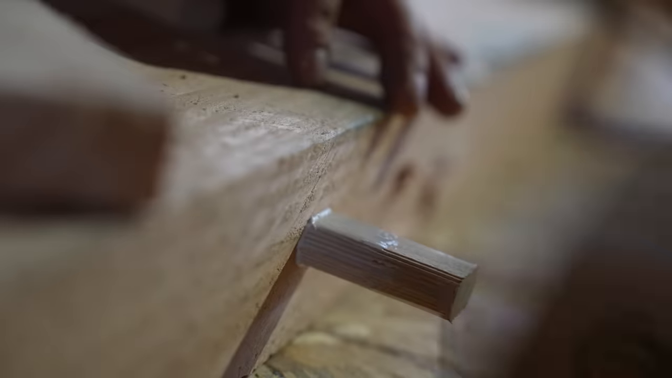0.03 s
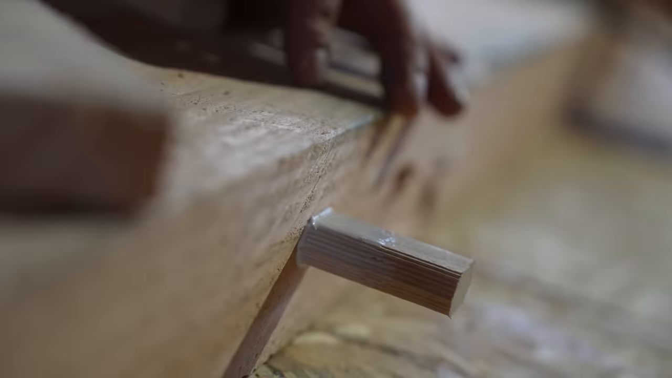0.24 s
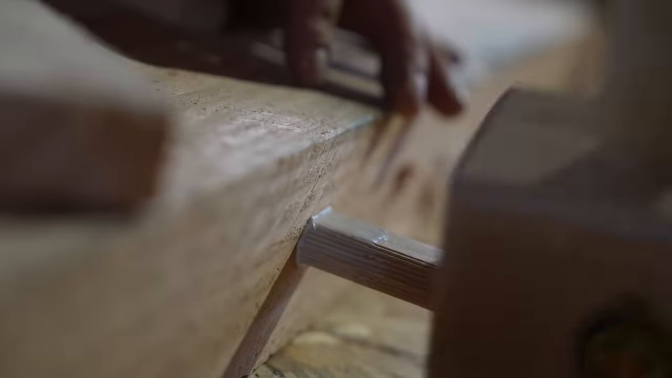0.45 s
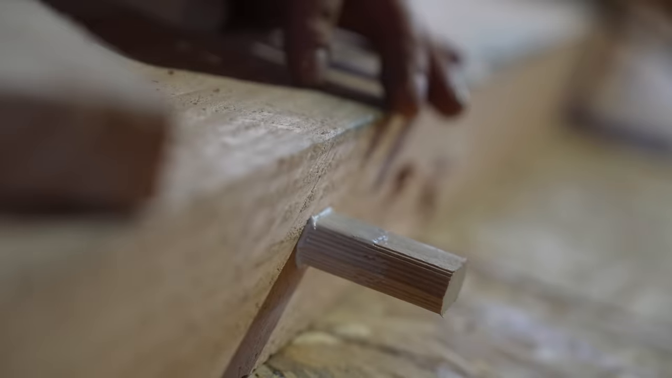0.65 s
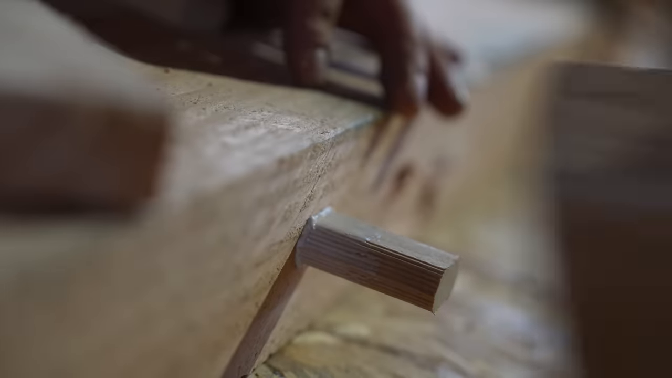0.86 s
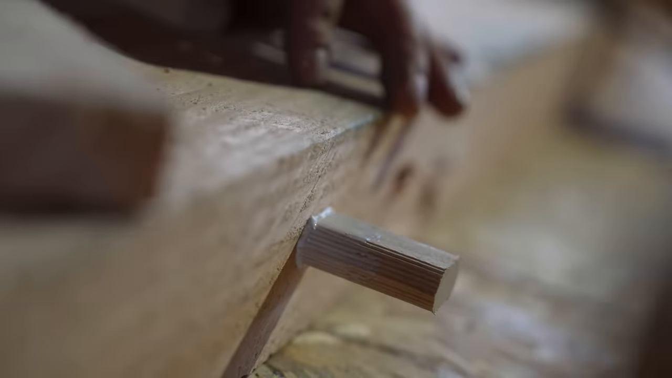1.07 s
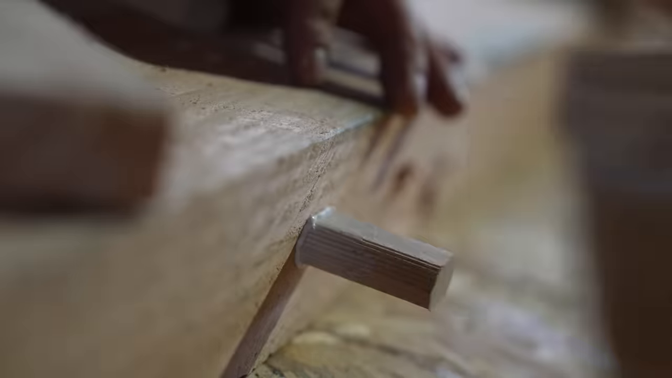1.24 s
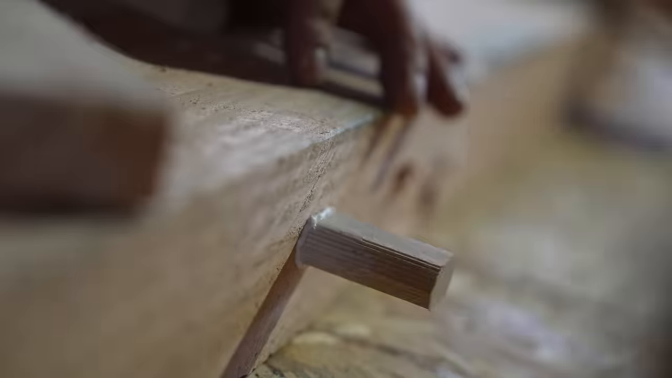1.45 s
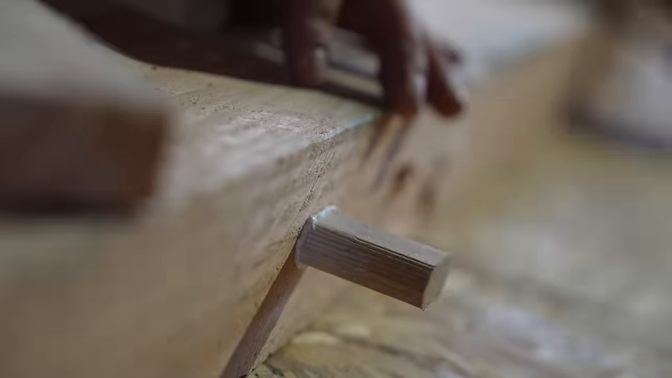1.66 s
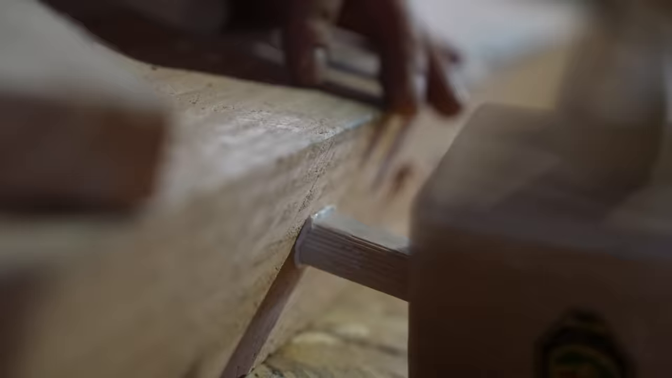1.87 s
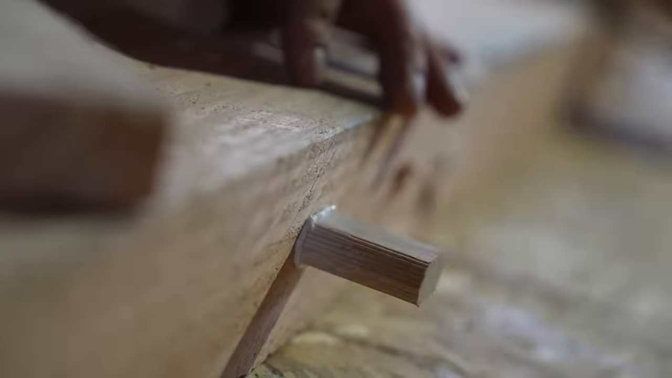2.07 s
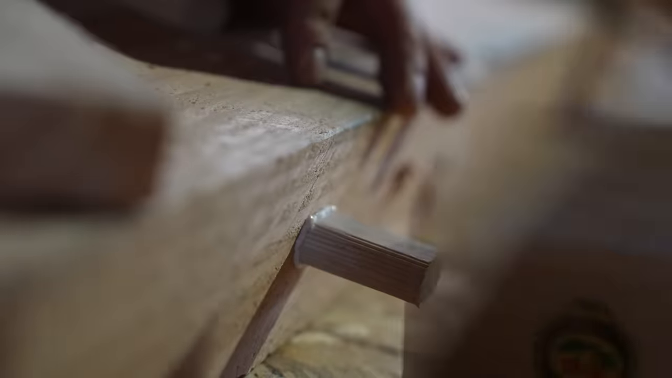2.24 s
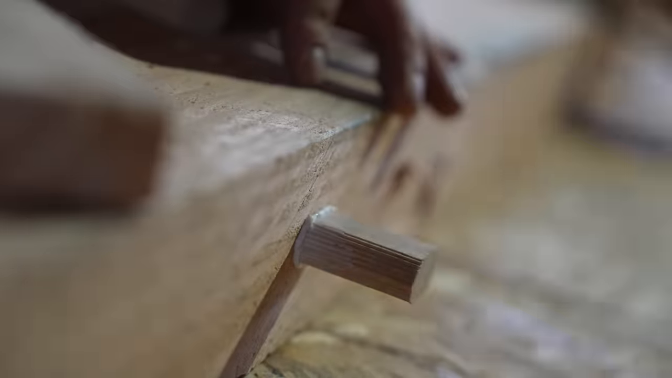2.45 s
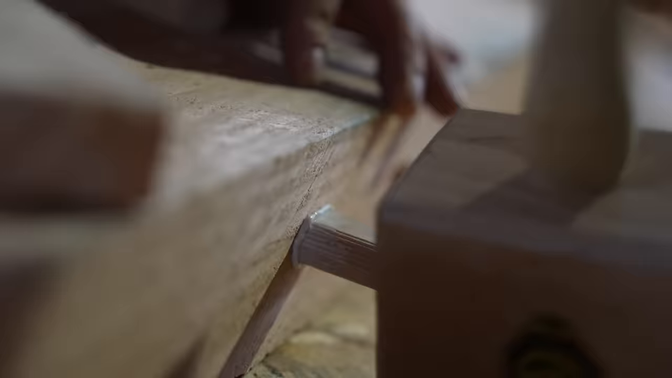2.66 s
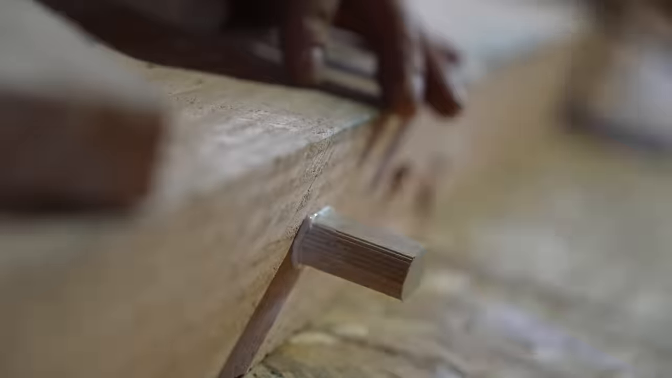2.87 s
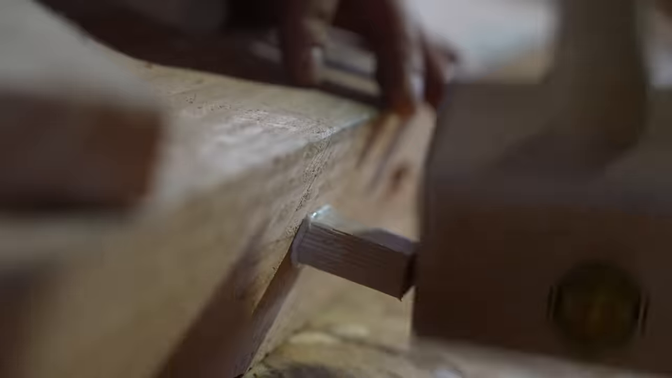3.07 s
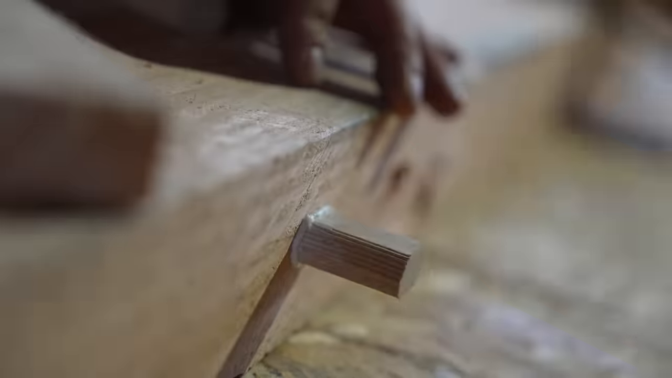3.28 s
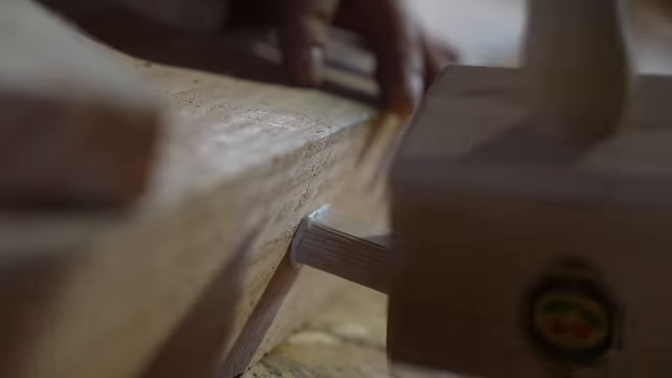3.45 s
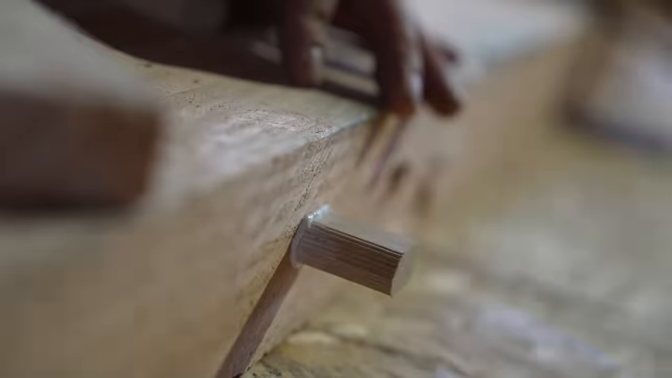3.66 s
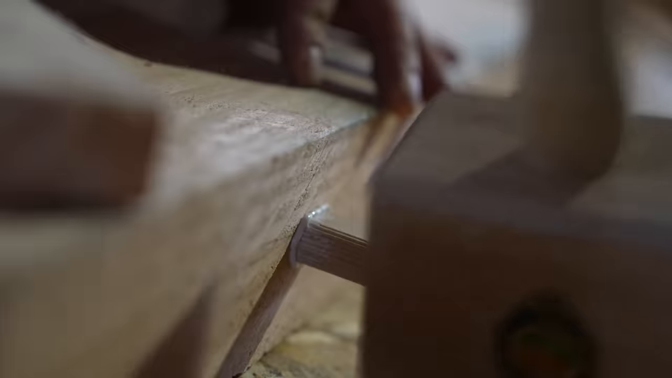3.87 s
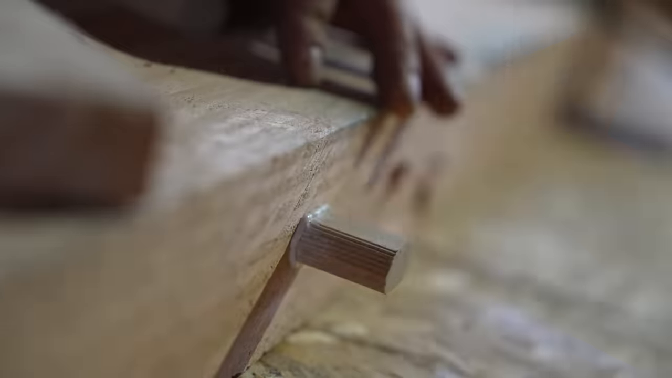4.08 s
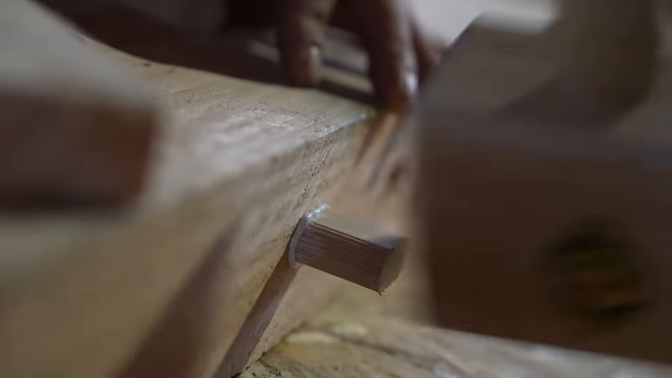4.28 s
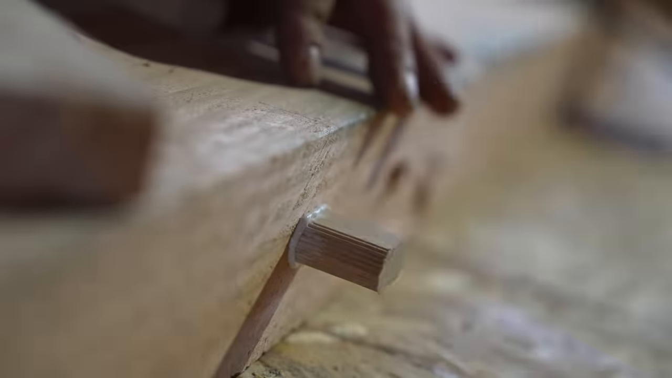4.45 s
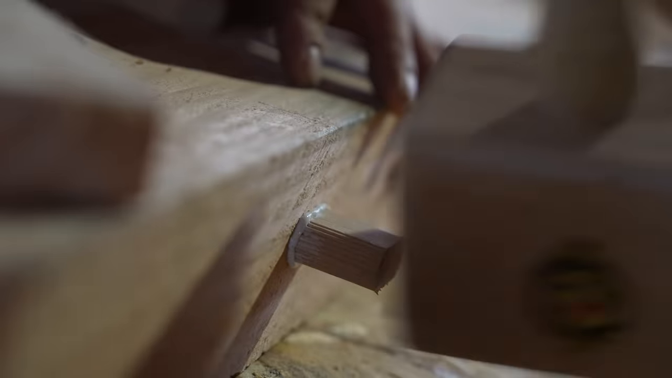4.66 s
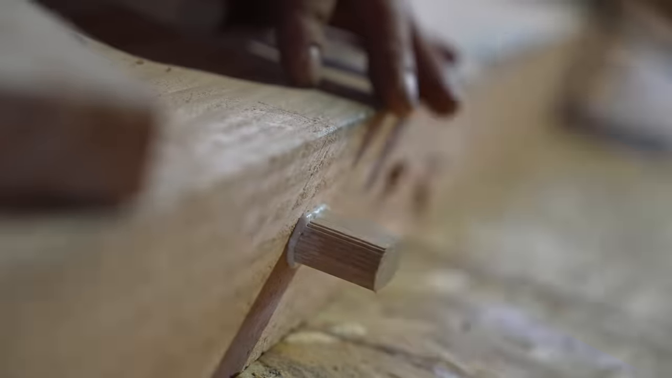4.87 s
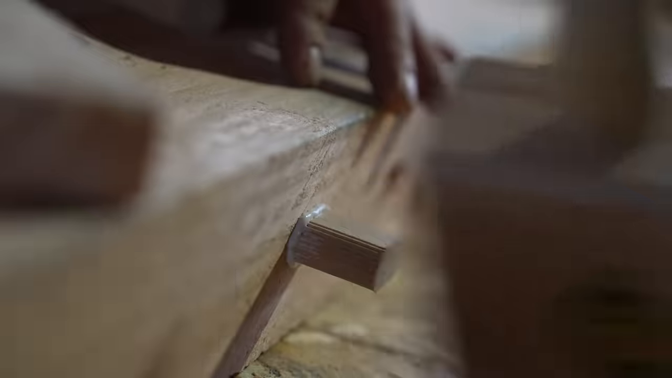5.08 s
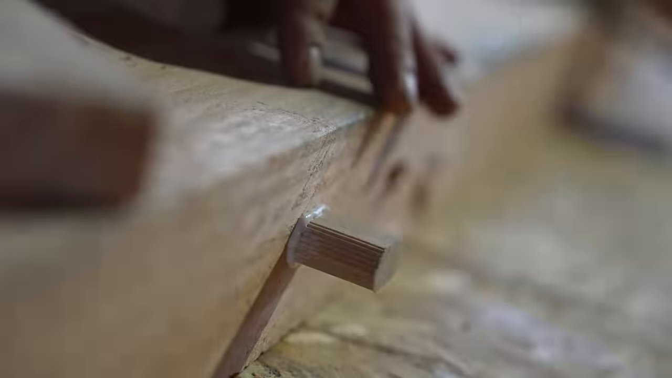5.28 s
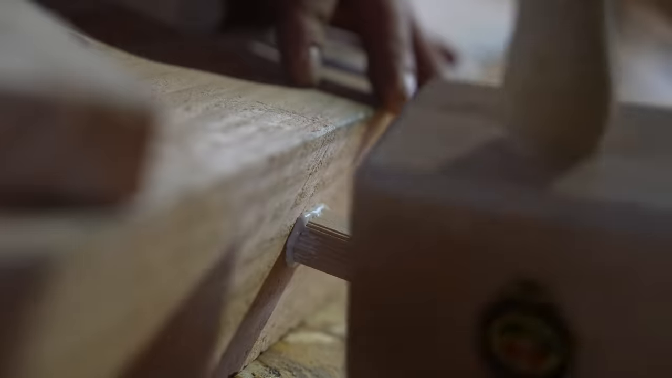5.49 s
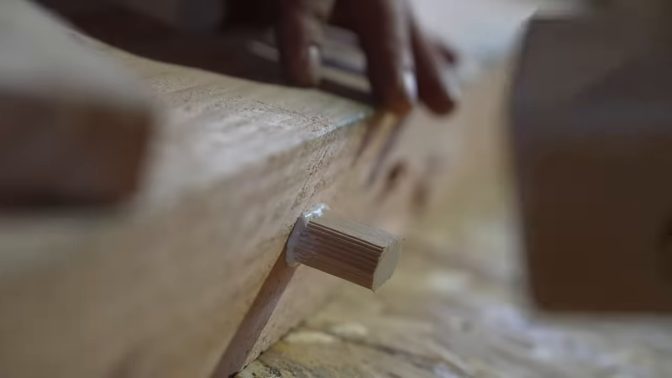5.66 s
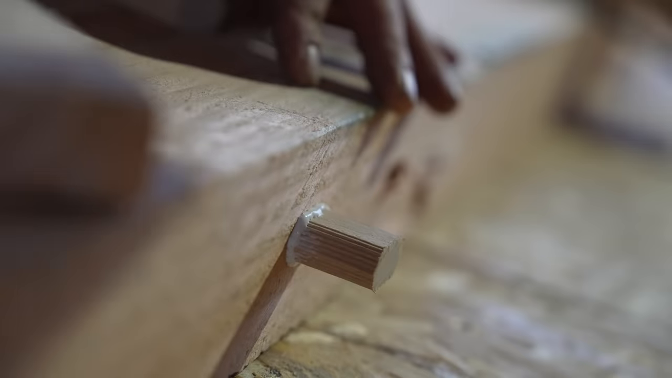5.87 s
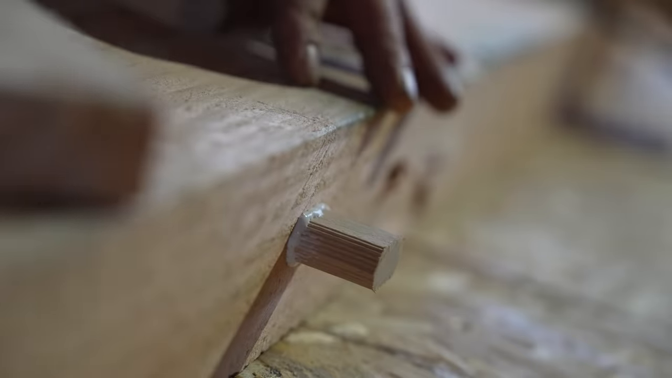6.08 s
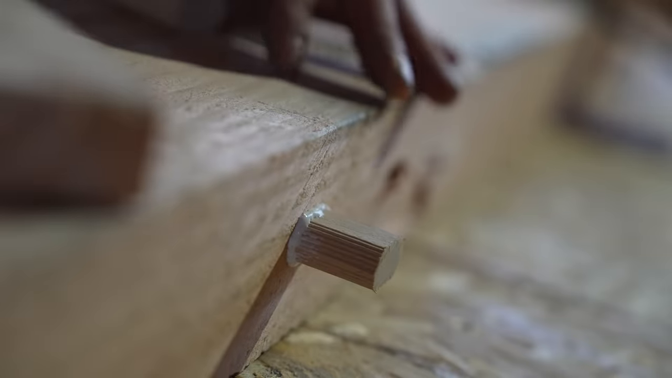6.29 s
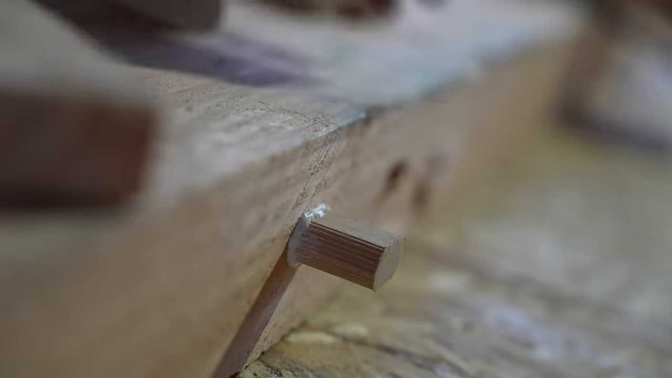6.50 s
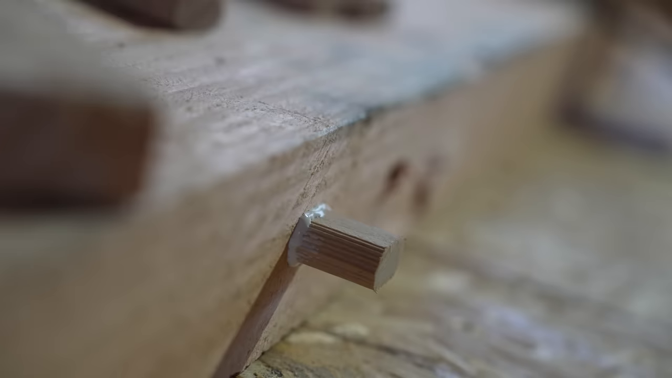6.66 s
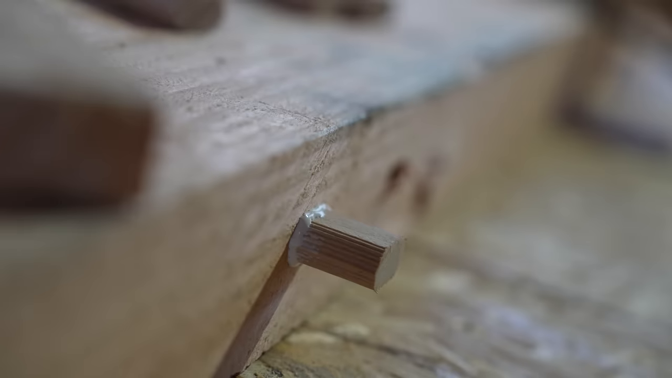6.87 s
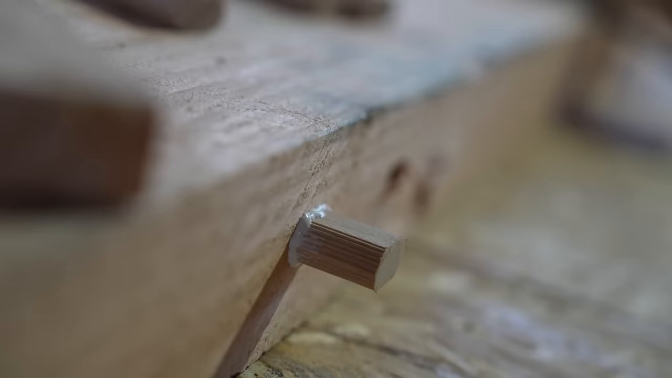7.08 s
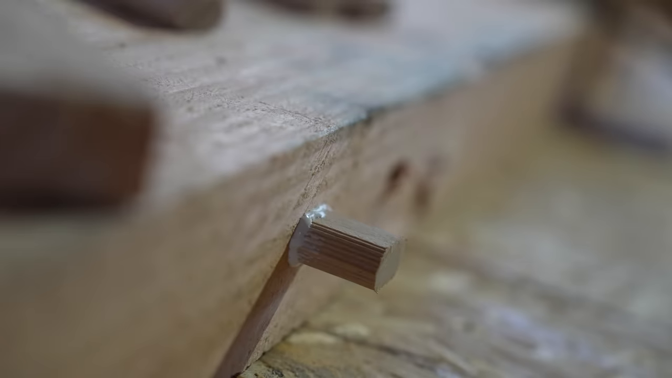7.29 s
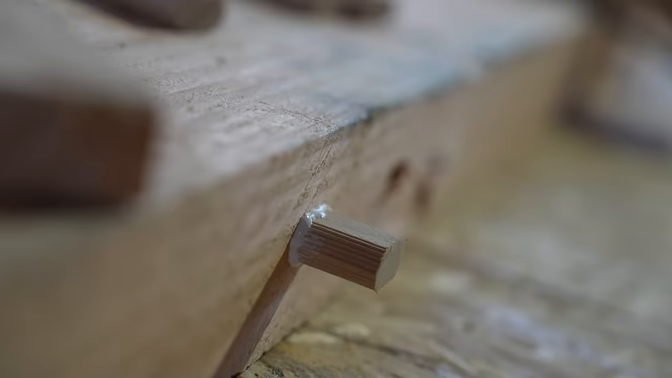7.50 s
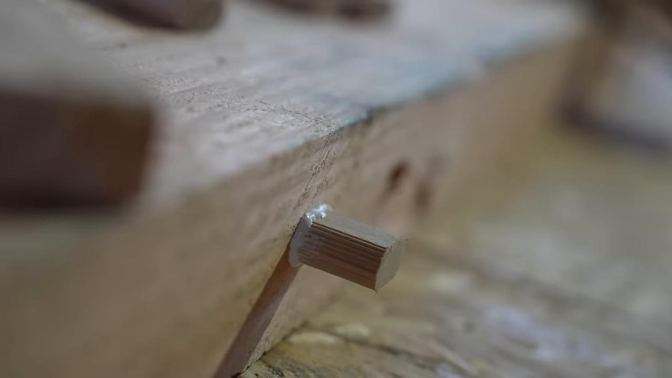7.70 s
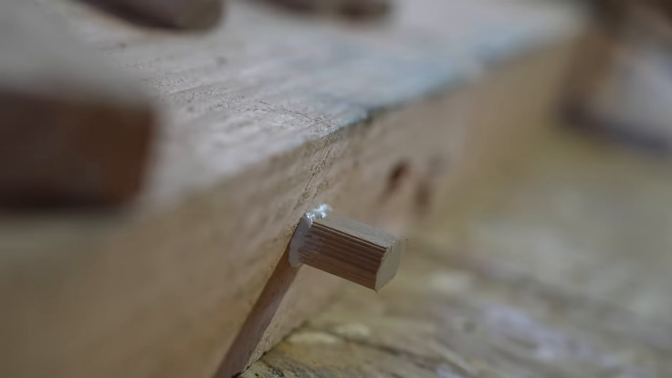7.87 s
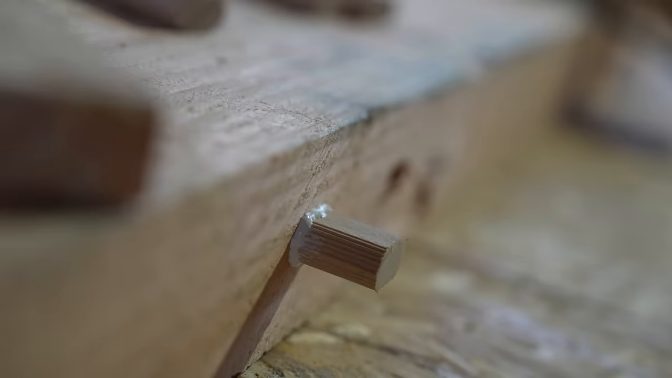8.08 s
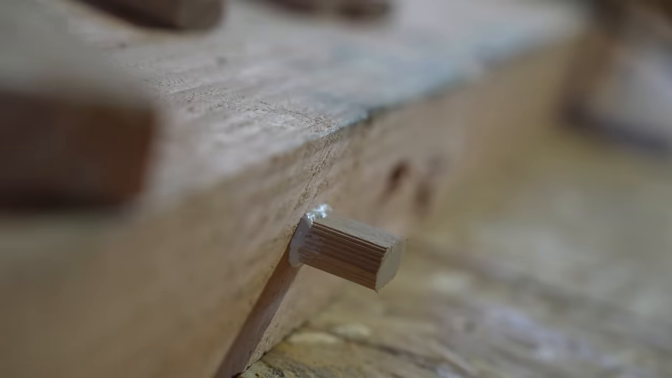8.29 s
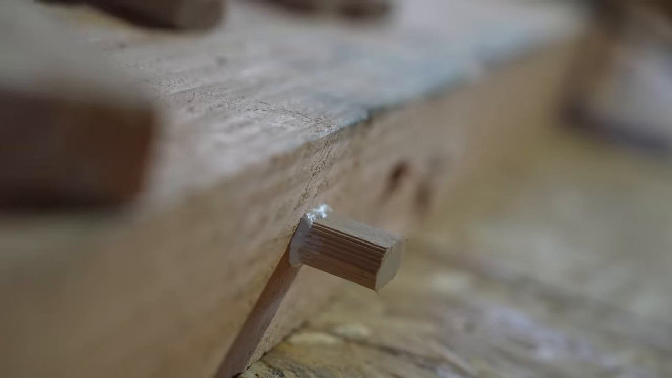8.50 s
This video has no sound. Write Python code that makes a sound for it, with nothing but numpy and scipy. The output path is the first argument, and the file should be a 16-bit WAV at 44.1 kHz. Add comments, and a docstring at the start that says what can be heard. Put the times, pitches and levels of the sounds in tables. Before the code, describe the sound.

A wooden mallet drives a dowel into a timber beam, close up in a bare workshop, with the sound leaning left. The tail of an earlier blow is fading at the start. From 0.1 to 5.5 seconds come fifteen steady blows, a little under 0.4 seconds apart. Each is a short, bright crack that slightly overloads the microphone, followed by about half a second of ringing from beam and room. They strengthen toward 4 seconds and turn hollow from about 4.7 as the dowel seats. Padded knocks fall near 1.1 and 3.1 seconds.

After the hammering, a hand brushes faintly off the wood around 6.2 to 6.8 seconds, with small ticks and a soft thud. At 6.8 the mallet is set down with a dull clunk, followed by light ticks at 7.1. Two soft shuffles come at 7.5 and 8.2 seconds. A faint rumble and hiss of still air lies underneath throughout.

```python
"""A wooden mallet drives a dowel into a timber beam: fifteen blows, close up in a bare workshop.
Each blow is a short crack that overloads the microphone, then beam and room ring on; the last
blows turn hollow as the dowel seats. Padded knocks and small ticks fall between and after them.
A hand brushes off the beam, the mallet is set down with a clunk, and two soft shuffles follow,
all over a faint bed of still air."""
import sys
import numpy as np
from scipy import signal
from scipy.fft import rfft, irfft
from scipy.io import wavfile

SR = 44100
rng = np.random.default_rng(int(sys.argv[2]) if len(sys.argv) > 2 else 0)


def unload_audio(sound):
    """Save the sound as a 16-bit wav file, at the path given as the first command line argument."""
    columns = np.transpose(np.atleast_2d(sound))
    # keep every value between -1 and 1, then stretch to whole-number steps
    steps = np.round(np.clip(columns, -1, 1) * 32767)
    wavfile.write(sys.argv[1], SR, steps.astype(np.int16))


N = 376613
SIZE = 32768  # samples in one hit and its tail
T = np.arange(SIZE) / SR
FREQS = np.maximum(np.fft.rfftfreq(SIZE, 1 / SR), 1)

# Decay of the workshop's reverb: freq_hz, t60_s
WORKSHOP_DECAY = [(60, 0.62), (160, 0.41), (450, 0.55), (1400, 0.43), (3000, 0.39), (7000, 0.33),
                  (14000, 0.29)]
# Tone of the still air: freq_hz, level_db
AIR_SPECTRUM = [(15, -36.5), (25, -6.5), (190, -4), (270, -9.5), (317, 2), (373, -9.5), (489, -13),
                (1290, -16), (1520, -19), (12200, -28.5), (16000, -33)]
# Mallet blows, where edge is the extra treble of a square hit: start_s, strength_db, edge_db
MALLET_BLOWS = [(0.1336, -1.5, -4.5), (0.4916, -1.05, 1), (0.8455, -0.7, 0), (1.199, 0.15, -4.5),
                (1.5794, -0.15, -1), (1.9521, 0.4, -3), (2.3388, 1.46, 0.5), (2.7268, 2.5, 0),
                (3.1095, 2.5, -4), (3.5016, 3, 0.5), (3.8941, 3.5, 0.1), (4.2769, 1.5, -1),
                (4.6755, 2.3, 2.5), (5.069, -0.2, -6.5), (5.4484, 3.1, -4)]
OPENING_TAIL = (-.235, -1, -3)  # same columns: a blow still ringing as the scene opens
# Modes of dowel and mallet head, choked by the contact: pitch_hz, level_db, t60_s
DOWEL_MODES = [(377.1, -17, 0.03), (887, -8.5, 0.0091), (1151, -19, 0.034), (1550, -5, 0.016),
               (2150, -7.5, 0.015), (2623, -5.5, 0.013), (3050, -4, 0.0059), (4040, -2.5, 0.0083),
               (4960, -9.5, 0.011), (6310, -13.5, 0.0089), (6830, -13.5, 0.0085), (9037, -14.5, 0.0077),
               (11100, -16, 0.0056)]
# Long resonances of the beam in the room: pitch_hz, level_db, t60_s
BEAM_MODES = [(70, -35, .7), (133, -19.5, .42), (155, -26, .42), (242, -26.5, .45), (308, -33, .42),
              (333, -26, .38), (520, -32, .45), (645, -36, .42), (818, -32, .45), (842, -30, .5),
              (860, -34, .42), (1033, -36, .42), (1188, -29.5, .42), (1208, -31, .42), (1360, -34, .42),
              (1385, -32, .46), (1442, -34, .46), (1464, -31, .48), (1543, -31, .45), (1568, -28, .41),
              (1595, -32, .36), (1652, -31, .42)]
# The beam's hollow note, fading early and growing as the dowel tightens: time_s, level_db
HOLLOW_LEVELS = [(0.13, -18), (0.49, -29.5), (0.85, -20.5), (1.45, -42), (1.95, -43.5), (2.7, -22),
                 (4.28, -21), (4.68, -16), (5.45, -20)]
# Tone that a blow sends into the room: freq_hz, level_db
BLOW_SEND = [(25, -20.5), (55, -18.5), (90, -10.5), (140, 1), (250, -2.5), (400, -9.5), (600, -13.5),
             (950, -12), (1250, -13.5), (1520, -3.5), (1800, -6.5), (3000, -6.5), (6000, -20), (15000, -30)]
# Clusters of beam resonances that colour the reverb: centre_hz, width_hz, boost_db
BEAM_CLUSTERS = [(495, 24, 4.5), (826, 60, 6.5), (1196, 45, 6.5), (1400, 110, 5), (1620, 90, 2),
                 (2461, 34, 3.5)]
# Padded knocks on the timber: start_s, level_db, centre_hz, t60_s, relative_boom_db
KNOCKS = [(1.058, 0, 94.7, 0.11, -13), (3.0979, 11.5, 277, 0.036, -15.5), (6.467, -13, 240, .19, 3.5)]
# Small handling ticks: start_s, level_db, t60_s, width_octaves
HANDLING_TICKS = [(1.059, -15, .007, .45), (5.93, -30, 0.059, 0.95), (6.452, -35, 0.016, 0.93),
                  (6.516, -37, .015, 1.2), (7.095, -27, 0.1, 1.02), (7.123, -30, 0.032, 1.1)]
# Three brushes over wood, then two soft shuffles: start_s, level_db, centre_hz, t60_s
BRUSHES = [(6.228, -30, 2000, .14), (6.52, -38.5, 2900, .9), (6.752, -27, 1000, .12),
           (7.492, -28.5, 790, 0.34), (8.163, -26, 650, 0.39)]
# The mallet's two contacts as it is set down: start_s, level_db
MALLET_LANDINGS = [(6.794, -6.5), (6.7975, -21.5)]
# Modes of the mallet landing on timber: pitch_hz, level_db, t60_s
CLUNK_MODES = [(302.5, -12.5, 0.21), (415, -10, 0.23), (553, -13, 0.078), (651, -5, 0.13), (806, -1.5, .04),
               (997, -10, 0.12), (1206, -11.5, 0.077), (1570, -12.5, 0.082), (2027, -10, 0.029)]
# Tone that the clunk sends into the room: freq_hz, level_db
CLUNK_SEND = [(40, -20), (100, 2.5), (190, -4.5), (400, -5), (680, -5), (1200, -8), (1800, -12.5),
              (3200, -34), (5500, -48.5), (12000, -49.5)]


def undb(db):
    """Decibels to gain."""
    return 10 ** (np.asarray(db) / 20)


def along(points, hz):
    """Read a curve of (freq_hz, value) points on a log-frequency axis."""
    freqs, values = np.transpose(points)
    return np.interp(np.log(hz), np.log(freqs), values)


def unit(x):
    """Scale to an energy of 1."""
    return x / np.sqrt(np.sum(x ** 2, axis=-1, keepdims=True))


def colour(x, db):
    """Minimum-phase EQ with the given gain at each of FREQS."""
    cepstrum = irfft(np.log(undb(db)))
    cepstrum[1:SIZE // 2] *= 2
    cepstrum[SIZE // 2 + 1:] = 0
    return irfft(rfft(x) * np.exp(rfft(cepstrum)))


def add(out, start_s, sound):
    """Mix a sound in at start_s, which may lie before zero."""
    start = int(start_s * SR)
    skip = max(-start, 0)
    out[:, start + skip:start + SIZE] += sound[..., skip:N - start]


def fade(t60):
    """Exponential decay, 60 dB in t60 seconds."""
    return np.exp(-np.log(1000) * T / t60)


def ring(modes, phases, detune=1):
    """A stack of decaying sines, one for each mode."""
    return sum(undb(db) * fade(t60) * np.sin(2 * np.pi * hz * detune * T + phase)
               for (hz, db, t60), phase in zip(modes, phases))


def click(t60, cutoff_hz):
    """A contact transient: a low-passed burst of noise."""
    burst = rng.standard_normal(SIZE) * fade(t60)
    return unit(colour(burst, -10 * np.log10(1 + (FREQS / cutoff_hz) ** 4)))


def workshop_reverb(count, build_s=0.026, early=0.69, early_hz=4500, boom_hz=220):
    """Diffuse room responses: nearby timber returns the mids first, the walls some 20 ms later."""
    spectra = rfft(rng.standard_normal((count, SIZE)))
    centres = np.log([hz for hz, _ in WORKSHOP_DECAY])
    walls = 1 - np.exp(-(T / build_s) ** 4)
    out = 0
    for share, (hz, t60) in zip(np.eye(len(centres)), WORKSHOP_DECAY):
        near = early / (1 + (hz / early_hz) ** 2) / (1 + (boom_hz / hz) ** 2)
        band = irfft(spectra * np.interp(np.log(FREQS), centres, share))
        out = out + band * fade(t60) * (near + (1 - near) * walls)
    return unit(out)


def still_air(level_db=-66.5, spread=0.24):
    """A faint, steady bed of rumble and hiss, nearly mono."""
    hz = np.maximum(np.fft.rfftfreq(N, 1 / SR), 1)
    noise = rng.standard_normal(N) + spread * rng.standard_normal((2, N))
    bed = irfft(rfft(noise) * undb(along(AIR_SPECTRUM, hz)), N)
    return undb(level_db) * bed / np.std(bed)


def dowel_crack(edge_db, click_db=9, pitch_scatter=0.011):
    """The dowel's choked ring, voiced anew by each contact, under the click of fibres meeting."""
    modes = [(hz, db + rng.standard_normal(), t60) for hz, db, t60 in DOWEL_MODES]
    detune = 1 + pitch_scatter * rng.standard_normal()
    tone = ring(modes, np.pi * np.arange(len(modes)), detune)
    return tone + undb(click_db + 0.13 * edge_db) * click(t60=0.0054, cutoff_hz=8000)


def beam_ring(phases, hollow_db, hollow_hz=496.5, hollow_t60=0.39):
    """The beam's resonances bloom as the room fills; the low boom arrives last."""
    out = 0
    for mode, phase in zip(BEAM_MODES + [(hollow_hz, hollow_db, hollow_t60)], phases):
        rise_s = 0.037 if mode[0] < 260 else 0.014
        out = out + ring([mode], [phase]) * (1 - np.exp(-(T / rise_s) ** 2))
    return out


def seating_eq(start_s, edge_db, home_s=4.74, ease_s=0.27, seated_db=10, mid_hz=900, octaves=0.67):
    """Mids handed to the beam, in dB: more once the dowel is home, more from a glancing blow."""
    home_db = seated_db / (1 + np.exp((home_s - start_s) / ease_s))
    glancing_db = -0.57 * edge_db
    bell = np.exp(-.5 * (np.log2(FREQS / mid_hz) / octaves) ** 2)
    return (home_db + glancing_db) * bell


def mallet_blows(room, room_db=14, variation=0.47, edge_hz=5500):
    """Every blow cracks, then sets beam and room ringing; square hits come out brighter."""
    out = np.zeros((2, N))
    phases = rng.uniform(0, 2 * np.pi, len(BEAM_MODES) + 1)
    clusters_db = sum(db / (1 + (2 * (FREQS - hz) / width) ** 2) for hz, width, db in BEAM_CLUSTERS)
    send_db = along(BLOW_SEND, FREQS) + clusters_db
    treble_shelf = 1 / (1 + (edge_hz / FREQS) ** 3)
    # The mallet never lands quite the same way, so part of the room's answer changes.
    fresh_rooms = workshop_reverb(count=len(MALLET_BLOWS) + 1)
    for (start_s, strength_db, edge_db), fresh in zip([OPENING_TAIL, *MALLET_BLOWS], fresh_rooms):
        reverb = unit(colour(room + variation * fresh, send_db))
        hollow_db = np.interp(start_s, *np.transpose(HOLLOW_LEVELS))
        beam = beam_ring(phases + 0.31 * rng.standard_normal(len(phases)), hollow_db)
        blow = dowel_crack(edge_db) + undb(room_db) * reverb + beam
        eq_db = strength_db + seating_eq(start_s, edge_db) + edge_db * treble_shelf
        add(out, start_s, colour(blow, eq_db))
    return out


def touch(room, hz, t60, rise_s, room_db, octaves=0.84):
    """A damped, unpitched contact: one broad noise band that swells and dies, plus its reverb."""
    band_db = np.maximum(-3 * (np.log2(FREQS / hz) / octaves) ** 2, -70)
    attack = 1 - np.exp(-T / rise_s)
    direct = unit(colour(rng.standard_normal(SIZE) * attack * fade(t60), band_db))
    return direct + undb(room_db) * unit(colour(room * attack, band_db))


def padded_knocks(room, boom_delay_s=0.014):
    """Soft thuds against the timber, each trailed by the room's low boom."""
    out = np.zeros((2, N))
    for start_s, db, hz, t60, boom_db in KNOCKS:
        add(out, start_s, undb(db) * touch(room, hz, t60, rise_s=0.0015, room_db=-9))
        boom = touch(room, hz=119, t60=0.54, rise_s=.04, room_db=-5, octaves=1.0)
        add(out, start_s + boom_delay_s, undb(db + boom_db) * boom)
    return out


def handling_ticks(room, centre_hz=1900):
    """Light contacts with a fast attack and little reverb."""
    out = np.zeros((2, N))
    for start_s, db, t60, octaves in HANDLING_TICKS:
        tick = touch(room, centre_hz, t60, rise_s=.001, room_db=-10.5, octaves=octaves)
        add(out, start_s, undb(db) * tick)
    return out


def brushes_and_shuffles(room):
    """Brushing over wood, then two shuffles: soft-edged, roomy swells of friction noise."""
    out = np.zeros((2, N))
    for start_s, db, hz, t60 in BRUSHES:
        add(out, start_s, undb(db) * touch(room, hz, t60, rise_s=.03, room_db=-1))
    return out


def mallet_set_down(room, room_db=6, tick_db=-8):
    """The mallet head lands on one edge, then flat, with a dull clunk."""
    out = np.zeros((2, N))
    clunk = ring(CLUNK_MODES, np.pi * np.arange(len(CLUNK_MODES)))
    for start_s, db in MALLET_LANDINGS:
        tick = undb(tick_db) * click(t60=0.066, cutoff_hz=3000)
        add(out, start_s, undb(db) * (clunk + tick))
    reverb = unit(colour(room, along(CLUNK_SEND, FREQS)))
    add(out, MALLET_LANDINGS[0][0], undb(room_db) * reverb)
    return out


def scene(spread=0.32):
    """Every contact shares one narrow stereo reverb, over the bed of air."""
    responses = workshop_reverb(count=3)
    room = responses[0] + spread * responses[1:]
    mallet = mallet_blows(room) + mallet_set_down(room)
    handling = padded_knocks(room) + handling_ticks(room) + brushes_and_shuffles(room)
    return mallet + handling + still_air()


def record(dry, right_db=-10, ceiling=0.71, rolloff_hz=12000, cutoff_hz=15800):
    """The image leans left, where the cracks soft-clip; the top end rolls off, then cuts steeply."""
    panned = dry * undb([[0], [right_db]])
    clipped = panned / (1 + (panned / ceiling) ** 8) ** (1 / 8)
    dulled = signal.sosfilt(signal.butter(2, rolloff_hz, fs=SR, output="sos"), clipped)
    return signal.sosfilt(signal.ellip(8, .2, 70, cutoff_hz, fs=SR, output="sos"), dulled)


dry = scene()
out = record(dry)
unload_audio(out)
```